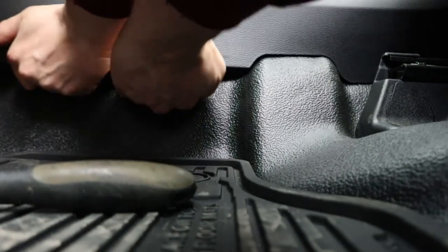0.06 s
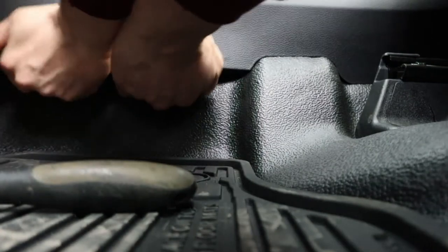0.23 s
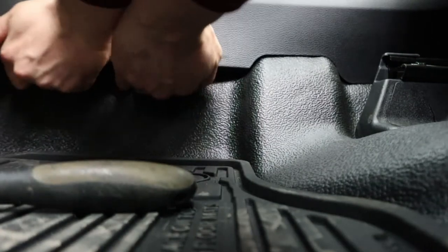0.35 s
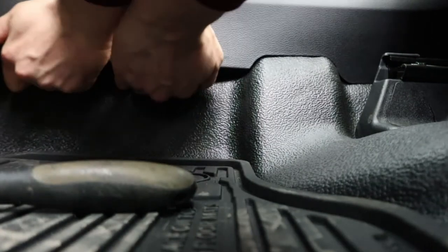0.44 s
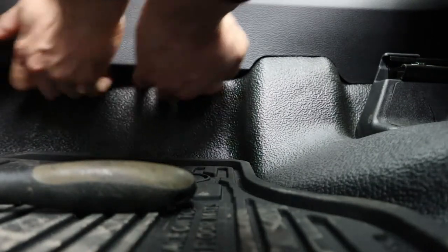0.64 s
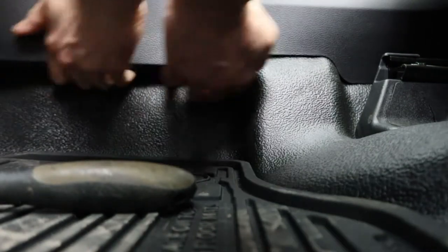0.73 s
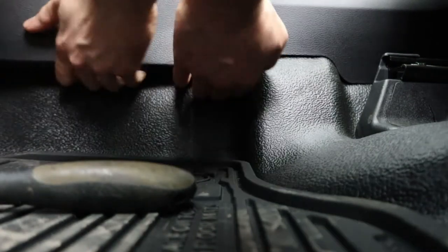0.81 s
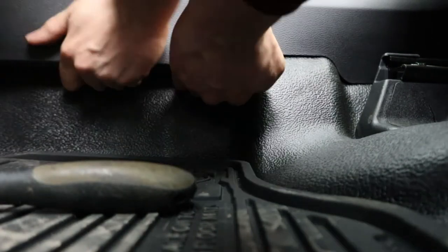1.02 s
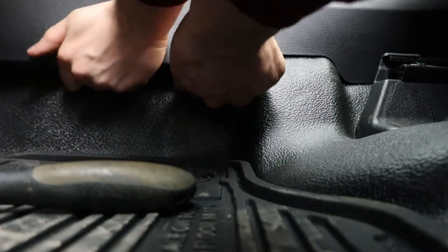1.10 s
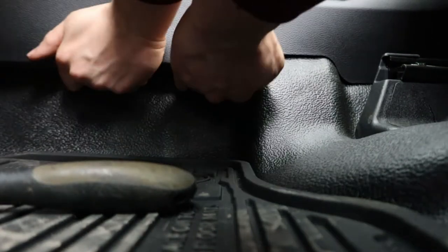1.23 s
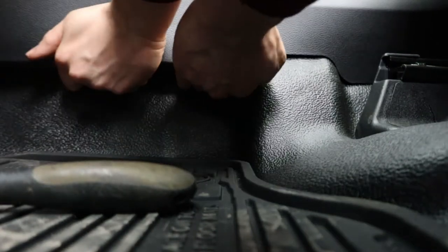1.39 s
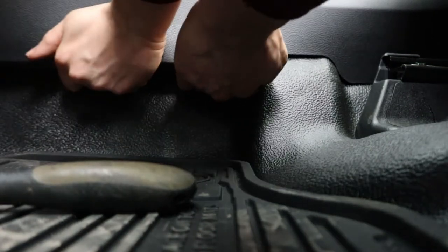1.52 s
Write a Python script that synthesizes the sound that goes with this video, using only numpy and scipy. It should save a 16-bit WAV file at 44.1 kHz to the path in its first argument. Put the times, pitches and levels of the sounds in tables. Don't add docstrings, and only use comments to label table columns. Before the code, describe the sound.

After faint hand knocks and a tiny squeak, a plastic trim panel snaps free, hard and distorting the close phone microphone; soft taps, scrapes and sliding hands follow over low cab rumble with a short dull echo.

```python
import sys
import numpy as np
from scipy import signal
from scipy.fft import rfft, irfft
from scipy.io import wavfile
from scipy.ndimage import uniform_filter1d

SR = 44100
rng = np.random.default_rng(int(sys.argv[2]) if len(sys.argv) > 2 else 0)


def bounce(signal):
    frames = np.transpose(np.atleast_2d(signal))
    limited = np.clip(frames, -1, 1)
    pcm = np.round(limited * 32767).astype(np.int16)
    wavfile.write(sys.argv[1], SR, pcm)


def voltage_ratio(decibels):
    exponent = np.asarray(decibels, float) / 20
    return 10 ** exponent


N = 68355

# freq_hz, density_db [dB per Hz]
CAB_SPECTRUM = [(15, -38), (25, -3), (90, -5.5), (154, -13), (769, -33), (1310, -29.5), (1720, -43),
                (3830, -42), (15000, -71.5)]
# freq_hz, density_db [dB per Hz]
SKIN_SPECTRUM = [(130, 3.5), (400, 5), (800, 1.5), (1400, -1), (2500, -9.5), (5000, -11), (9000, -20),
                 (15000, -22.5)]
# time_s, level_db, roughness_db
SLIDE_MOVES = [(0, -64.5, -0.5), (.06, -66, 1), (.19, -74, 9), (.3, -67, -1.7), (0.381, -70.5, -1),
               (.41, -82, -3), (.55, -72.5, 4), (.6, -60.5, -3), (.7, -55.5, -6.5), (0.774, -56.5, 2),
               (.8, -62.5, -8), (.91, -72, 3), (.95, -61.5, -8), (1.019, -64.5, -5), (1.13, -69, 1),
               (1.161, -72.5, 1), (1.269, -69.5, -2.2), (1.55, -86, 3)]
# start_s, peak_db, ring_hz, edge_db, edge_hz
HAND_KNOCKS = [(.100, -32.5, 279, -7, 920), (.107, -35.5, 280, -22, 1500), (.137, -32.5, 233, -13, 780),
               (.170, -40.5, 198.9, -19.5, 782), (.514, -34.5, 495, -28, 1500),
               (.593, -34, 613, -24.5, 2524), (.700, -41.5, 920, -15, 1500), (.752, -29, 268, 1, 506),
               (.790, -42.5, 578, -5.5, 1473), (.846, -37.5, 599, -15.5, 1280), (.960, -52.5, 170, -7, 800),
               (1.025, -37.5, 569, -34, 1320), (1.064, -48.5, 1300, -17, 600), (1.119, -46.5, 150, -5, 498),
               (1.257, -40, 293, -2, 596), (1.268, -47, 451, -2.5, 820), (1.356, -40.5, 594, -27.5, 2422),
               (1.399, -46, 71, -11.5, 1200), (1.472, -49.5, 520, -10, 1480)]
# start_s, peak_db, ring_hz, edge_db, edge_hz
PLASTIC_TICKS = [
    (.2985, -46.5, 1210, -0.5, 3900),
    (.3635, -31.5, 292, -5.5, 1121),
    (.5635, -33, 175, 3, 2650),
    (.5665, -39, 935, -11, 2920),
    (.6585, -43, 500, -9, 5550),
    (1.1945, -32.5, 217, -3.5, 735),
    (1.1955, -37.5, 1180, -3, 2900),
    (1.2915, -31, 568.4, -4, 1260),
    (1.4595, -55.5, 505, 5.5, 2340),
    (1.4815, -49, 513, 3.5, 2250),
]
# start_s, peak_db, ring_hz, edge_db, edge_hz
EDGE_SCRAPES = [
    (.281, -38, 222, -9, 1520),
    (.3335, -31, 986, -9, 2130),
    (.336, -40, 445, -5, 4010),
    (.369, -46.5, 600, -2.5, 1520),
    (.719, -40.5, 517, -4.5, 1200),
    (.873, -51.5, 1400, -9, 1340),
    (1.403, -56.5, 1212, -4.5, 2470),
    (1.499, -50.5, 682, -6, 2810),
    (1.516, -50.5, 1270, -5, 2820),
]
# freq_hz, level_db, t60_s
PANEL_MODES = [(227.3, -9.5, 0.13), (296.4, -0.5, 0.088), (482, 0.5, .056), (657, 0.5, 0.05),
               (867, -7, 0.034), (1014.7, -3, 0.035), (1317, -2, .036), (1717, -8, 0.024),
               (1985, -6, 0.013), (2159, 0, .031), (2488, -2, 0.039), (3127, -7, 0.018), (3748, -11, 0.031),
               (5240, -10.5, 0.031)]

RUMBLE_DB = -61
ECHO_T60_S, ECHO_DB, ECHO_TOP_HZ = 0.034, -11.5, 4630
CREAK_START_S, CREAK_LEN_S, CREAK_HZ, CREAK_DB = 0.027, 0.028, 2650, -55
BRIGHTEN = 0.077
KNOCK_T60_S, TICK_T60_S = .045, 0.033
SPREAD_OCT = 0.58
SNAP_S, SNAP_DB, SNAP_PUSH_S = .2049, 10, 0.001
SLIP_S, SLIP_DB = .016, -39
MODE_SPLIT = 0.064
DRIVE_DB, DRIVE_S = 12.5, 0.019
CRACK_DB, CRACK_T60_S = 3.5, 0.018
HISS_DB, HISS_T60_S = -36, 0.093
TAIL_DB, TAIL_T60_S = -24.5, 0.12
FLOP_HZ, FLOP_DB, FLOP_T60_S = 81, -42, .45


def unit(x):
    return x / np.sqrt(np.mean(x ** 2))


def colour(x, spectrum):
    hz, db = np.array(spectrum, float).T
    f = np.maximum(np.fft.rfftfreq(len(x), 1 / SR), 1)
    return irfft(rfft(x) * voltage_ratio(np.interp(np.log(f), np.log(hz), db)), len(x))


def band(x, lo_hz, hi_hz):
    edges = [lo_hz, min(hi_hz, .45 * SR)]
    return signal.sosfilt(signal.butter(2, edges, "band", fs=SR, output="sos"), x)


def band_noise(n, lo_hz, hi_hz):
    return unit(band(rng.standard_normal(n), lo_hz, hi_hz))


def fade(t, t60):
    return np.exp(-np.log(1000) * t / t60)


def walk(rate_hz):
    k = int(SR / rate_hz)
    held = np.repeat(rng.standard_normal(N // k + 1), k)
    return unit(uniform_filter1d(held, k)[:N])


def add(out, x, at_s):
    i = int(at_s * SR)
    out[i:i + len(x)] += x[:len(out) - i]


def ring(t, modes):
    return sum(voltage_ratio(db) * np.sin(2 * np.pi * hz * t) * fade(t, t60) for hz, db, t60 in modes)


def cab_rumble():
    return unit(colour(rng.standard_normal(N), CAB_SPECTRUM)) * voltage_ratio(RUMBLE_DB + 0.5 * walk(19))


def cab_echo(dry):
    t = np.arange(SR // 4) / SR
    echo = band(rng.standard_normal(len(t)), 220, ECHO_TOP_HZ) * fade(t, ECHO_T60_S)
    echo = echo * (t > .002)
    return voltage_ratio(ECHO_DB) * signal.fftconvolve(dry, echo / np.sqrt(np.sum(echo ** 2)))[:N]


def pin_creak():
    progress = np.clip((np.arange(N) / SR - CREAK_START_S) / CREAK_LEN_S, 0, 1)
    squeak = sum(voltage_ratio(db) * band_noise(N, k * CREAK_HZ * 0.92, k * CREAK_HZ * 1.09)
                 for k, db in ((1, -4), (2, -9.5)))
    return voltage_ratio(CREAK_DB + 1.8 * walk(194)) * np.sin(np.pi * progress) ** 0.16 * squeak


def skin_specks():
    return colour(rng.standard_normal(N) * voltage_ratio(1.9 * rng.exponential(size=N)), SKIN_SPECTRUM)


def sliding_hands():
    t = np.arange(N) / SR
    time_s, level_db, roughness_db = np.array(SLIDE_MOVES, float).T
    db = np.interp(t, time_s, level_db)
    rough_db = np.interp(t, time_s, roughness_db)
    low = sum(band(skin_specks(), hz, hz * 1.5) * voltage_ratio(walk(58)) for hz in 87 * 1.5 ** np.arange(8))
    high = np.zeros(N)
    for hz in 2200 * 1.5 ** np.arange(5):
        tilt_db = BRIGHTEN * (db + 62.5) * np.log2(hz / 2200)
        high += band(skin_specks(), hz, hz * 1.4) * voltage_ratio(1.5 * walk(60) + tilt_db)
    return voltage_ratio(db + 0.5) * (high + voltage_ratio(rough_db) * low) / np.std(high)


def panel_taps(rows, t60, contact_s, gain_db, top_db, reach):
    t, out = np.arange(SR // 6) / SR, np.zeros(N)
    contact = np.exp(-(t / contact_s) ** 2) * (1 - np.exp(-t / (.15 * contact_s)))
    for start_s, peak_db, hz, edge_db, edge_hz in rows:
        detune, uneven, grit, edge_noise, top_noise = rng.standard_normal((5, len(t)))
        modes = [(hz, 0, t60)]
        for k, (f, _, decay) in enumerate(PANEL_MODES):
            near_db = -7 - 3 * (np.log2(f / hz) / SPREAD_OCT) ** 2 + 2 * uneven[k]
            modes.append((f * (1 + 0.096 * detune[k]), near_db, decay * 1.8))
        impacts = contact * grit ** 3
        body = band(signal.fftconvolve(ring(t, modes), impacts)[:len(t)], hz / 2, hz * reach)
        edge = unit(band(edge_noise, edge_hz / 1.4, edge_hz * 1.2))
        edge = edge + voltage_ratio(top_db) * unit(band(top_noise, edge_hz, 6700))
        click = edge * (contact + 0.66 * fade(t, t60)) / 2
        tap = body / np.abs(body).max() + voltage_ratio(edge_db) * click
        add(out, voltage_ratio(peak_db + gain_db) * tap, start_s)
    return out


def clip_snap():
    t, out = np.arange(SR // 2) / SR, np.zeros(N)
    n = len(t)
    push = np.exp(-t[:1000] / SNAP_PUSH_S) * rng.standard_normal(1000) * (rng.random(1000) < .05)
    push[0] = -9
    modes = [(hz * (1 + MODE_SPLIT * side), db - 11 * abs(side), t60)
             for hz, db, t60 in PANEL_MODES for side in (-1, 0, 1)]
    body = band(signal.fftconvolve(ring(t, modes), push)[:n], 170, 14000)
    drive = voltage_ratio(DRIVE_DB * np.exp(-(t / DRIVE_S) ** 2))
    crack = band_noise(n, 1900, 8000) * fade(t, CRACK_T60_S)
    hiss = band_noise(n, 1200, 5600) * fade(t, HISS_T60_S)
    tail = band_noise(n, 100, 500) * fade(t, TAIL_T60_S) * np.clip(t / 0.011, 0, 1) ** 2
    flop = band_noise(n, FLOP_HZ * 0.37, FLOP_HZ * 0.59) * fade(t, FLOP_T60_S)
    flop = flop * (1 - np.exp(-t / 0.043))
    burst = body / np.abs(body).max() * drive + voltage_ratio(CRACK_DB) * crack / 2
    burst = burst + voltage_ratio(HISS_DB) * hiss + voltage_ratio(TAIL_DB) * tail + voltage_ratio(FLOP_DB) * flop
    add(out, voltage_ratio(SNAP_DB) * burst, SNAP_S)
    slip_t = t[t < SLIP_S]
    slip = slip_t / SLIP_S * band_noise(len(slip_t), 200, 1100)
    add(out, voltage_ratio(SLIP_DB) * slip, SNAP_S - SLIP_S)
    return out


def scene():
    struck = clip_snap()
    struck += panel_taps(HAND_KNOCKS, KNOCK_T60_S, contact_s=.006, gain_db=-2.5, top_db=-14, reach=2.5)
    struck += panel_taps(PLASTIC_TICKS, TICK_T60_S, contact_s=.0025, gain_db=-1.14, top_db=-12, reach=2.3)
    struck += panel_taps(EDGE_SCRAPES, TICK_T60_S, contact_s=.0098, gain_db=0.5, top_db=-10.5, reach=2.2)
    cab = cab_echo(struck) + cab_rumble()
    return (struck + cab + sliding_hands() + pin_creak())[None]


def top_cut(x):
    return signal.sosfilt(signal.butter(12, 15480, fs=SR, output="sos"), x)


def record(dry):
    x = signal.sosfilt(signal.butter(1, 72, "high", fs=SR, output="sos"), dry)
    x = x + voltage_ratio(-83.5) * band_noise(N, 9200, 16000)
    return top_cut(np.clip(x, -1, 1))


dry = scene()
out = record(dry)
bounce(out)
```